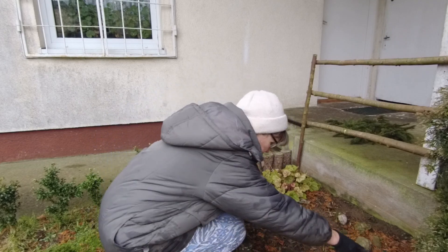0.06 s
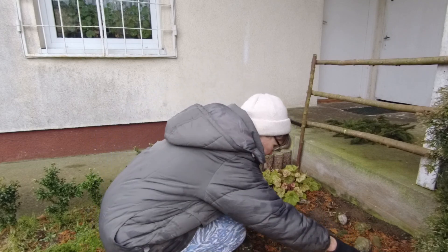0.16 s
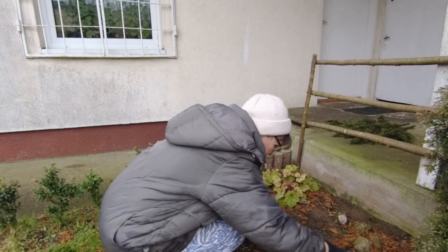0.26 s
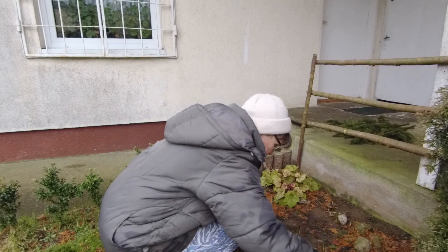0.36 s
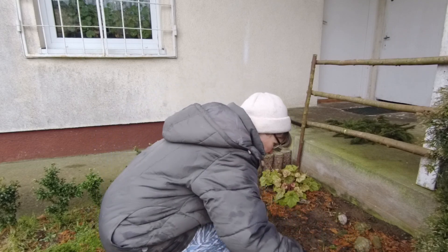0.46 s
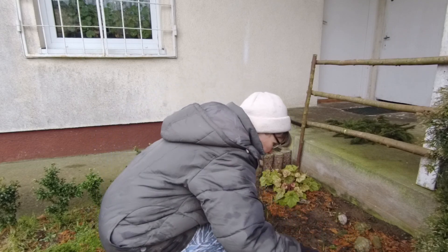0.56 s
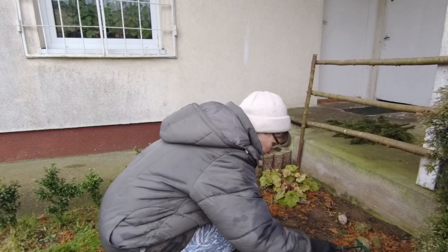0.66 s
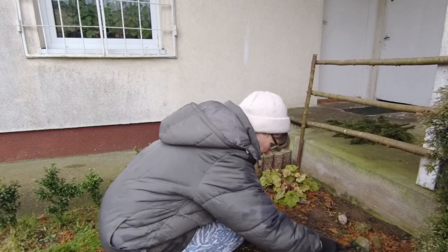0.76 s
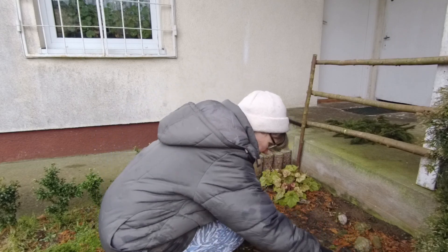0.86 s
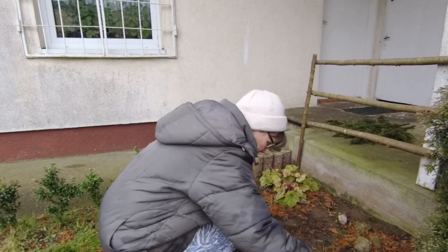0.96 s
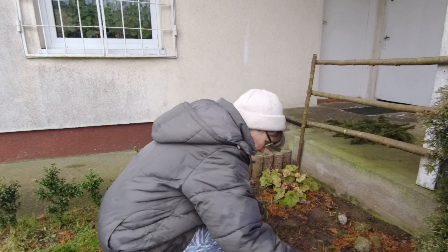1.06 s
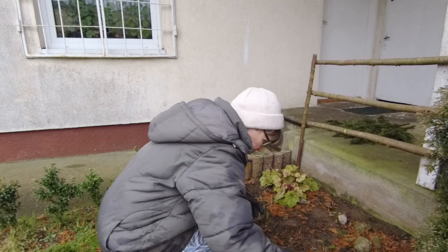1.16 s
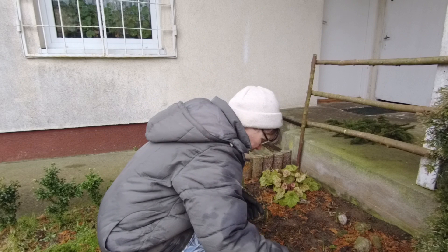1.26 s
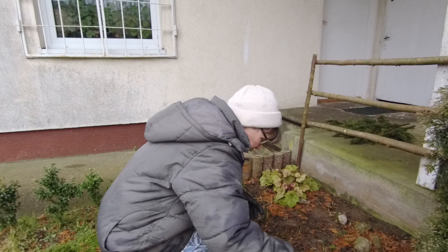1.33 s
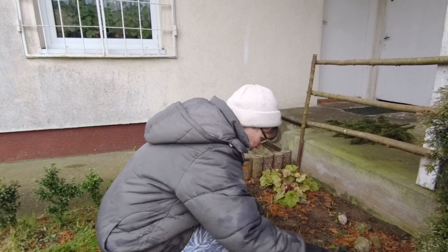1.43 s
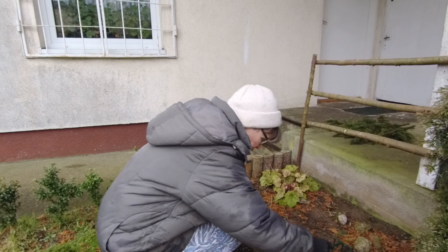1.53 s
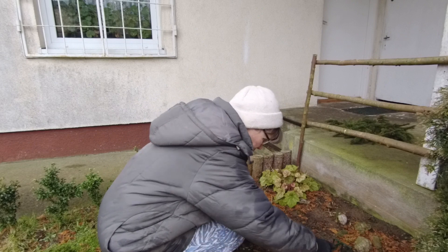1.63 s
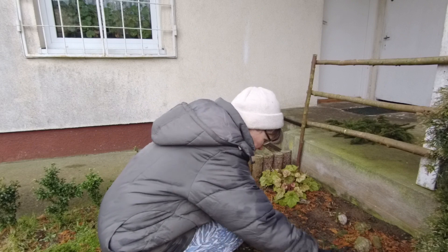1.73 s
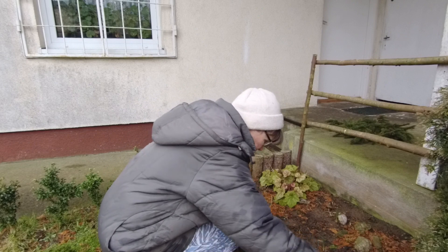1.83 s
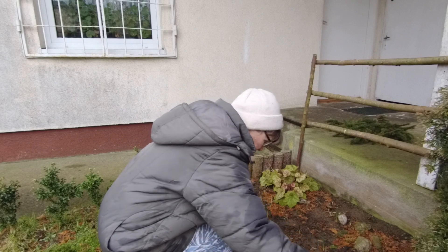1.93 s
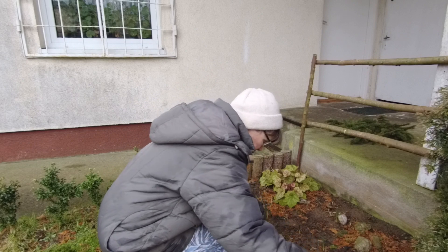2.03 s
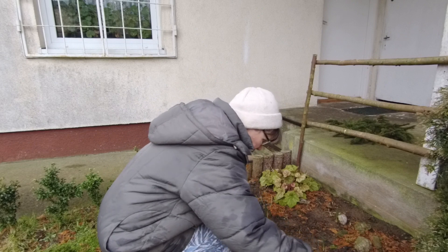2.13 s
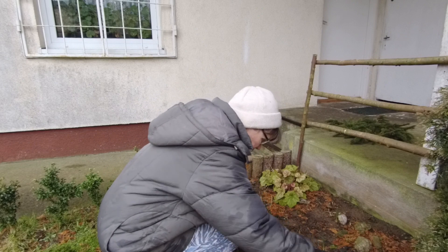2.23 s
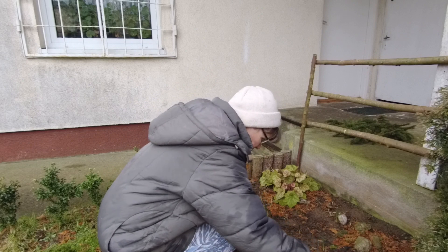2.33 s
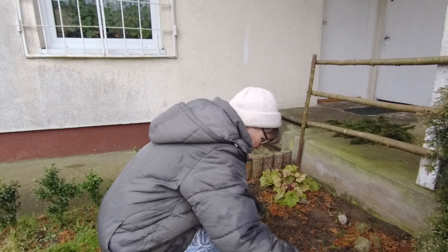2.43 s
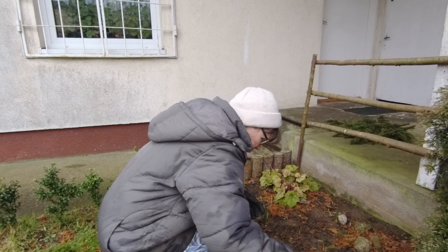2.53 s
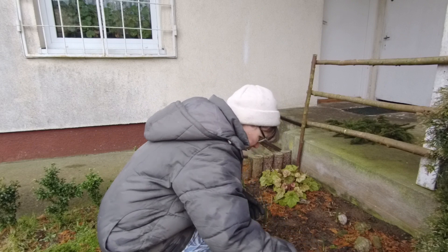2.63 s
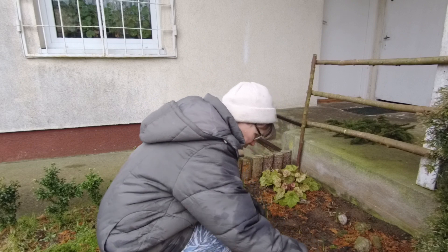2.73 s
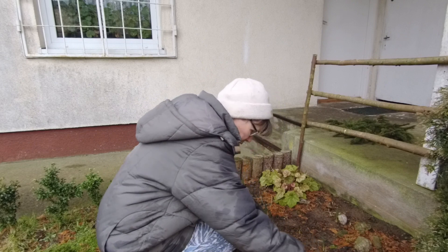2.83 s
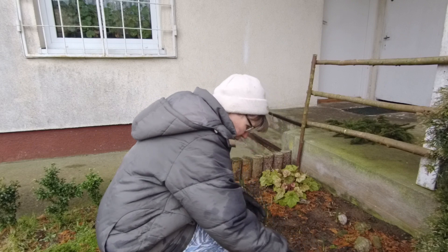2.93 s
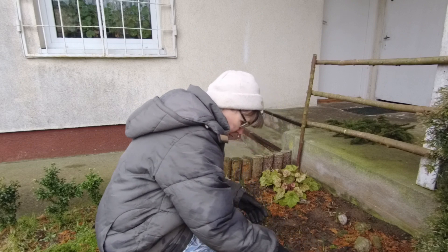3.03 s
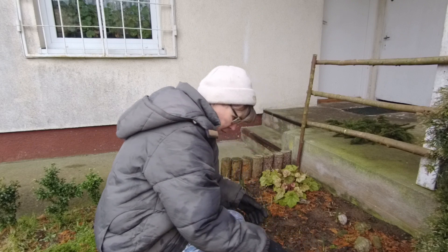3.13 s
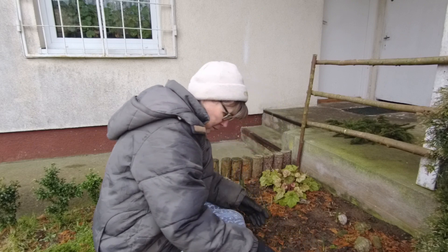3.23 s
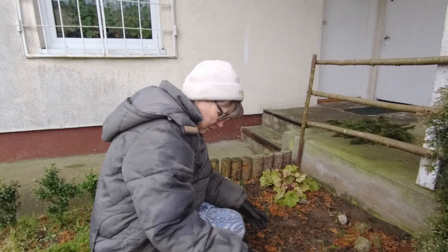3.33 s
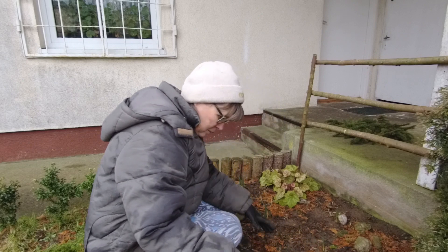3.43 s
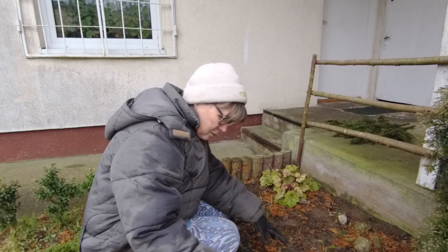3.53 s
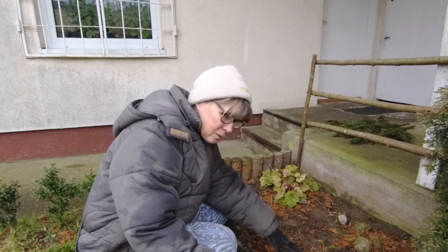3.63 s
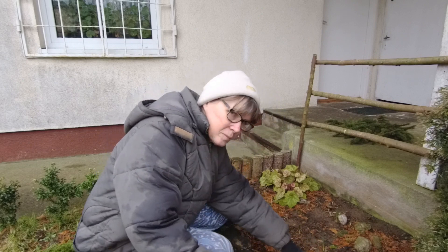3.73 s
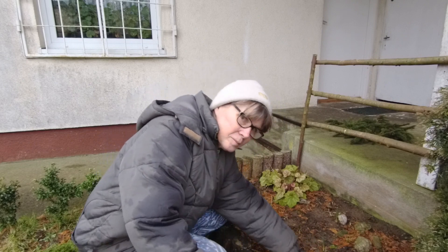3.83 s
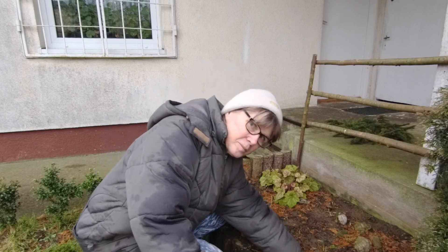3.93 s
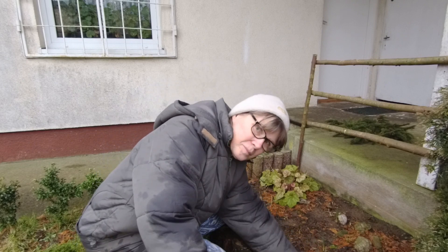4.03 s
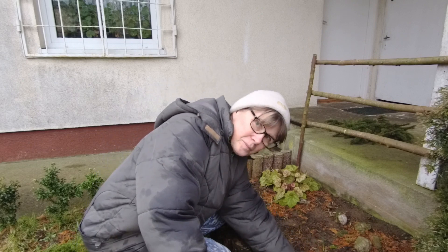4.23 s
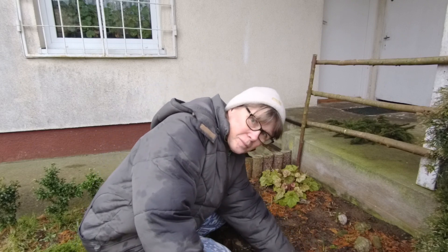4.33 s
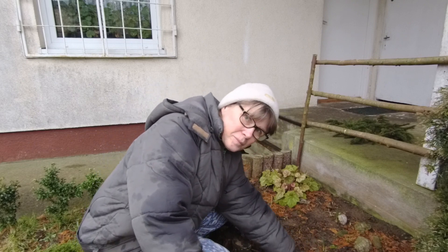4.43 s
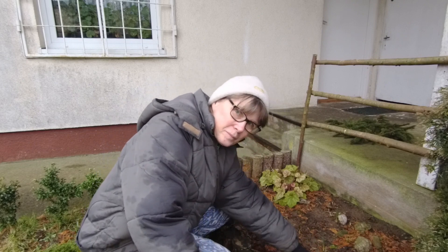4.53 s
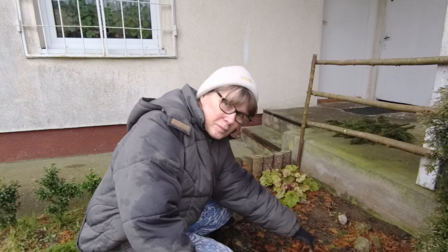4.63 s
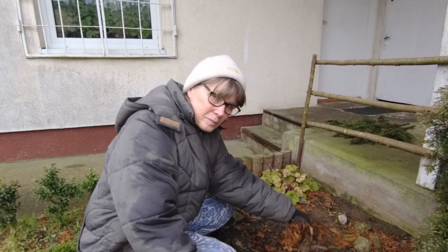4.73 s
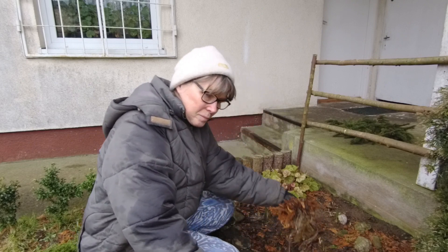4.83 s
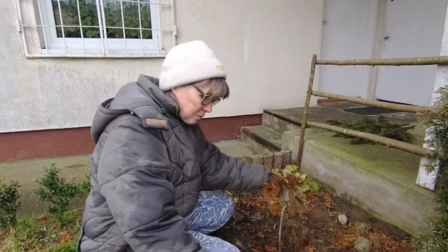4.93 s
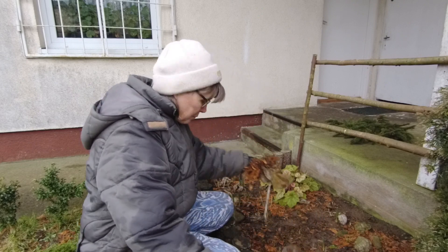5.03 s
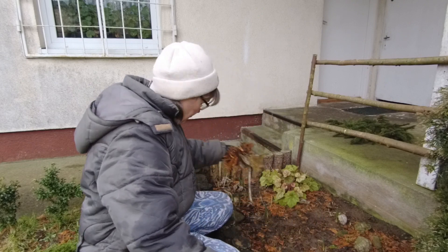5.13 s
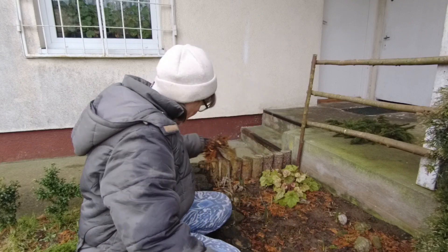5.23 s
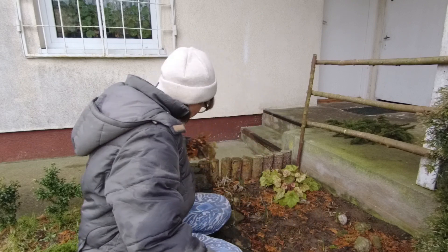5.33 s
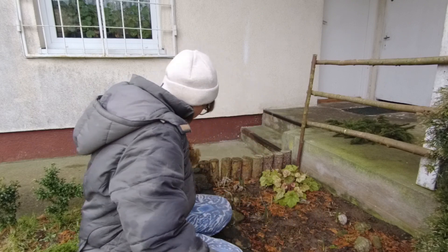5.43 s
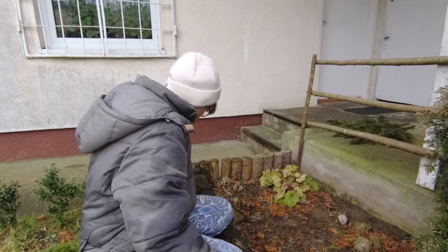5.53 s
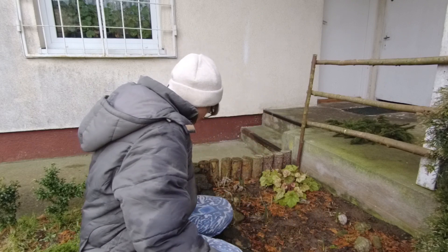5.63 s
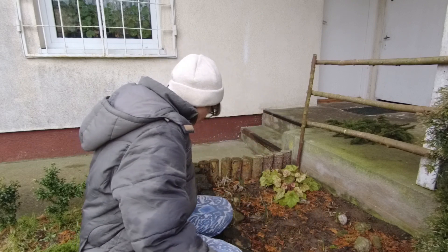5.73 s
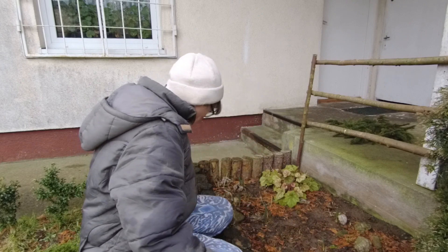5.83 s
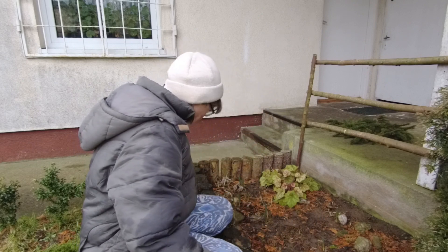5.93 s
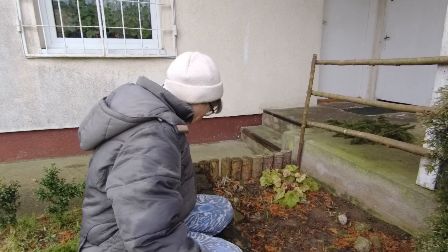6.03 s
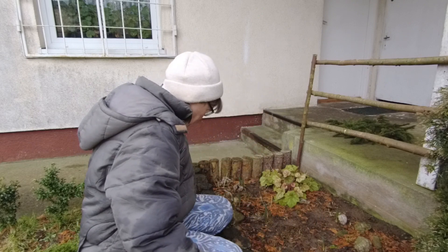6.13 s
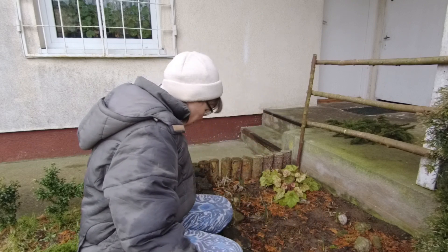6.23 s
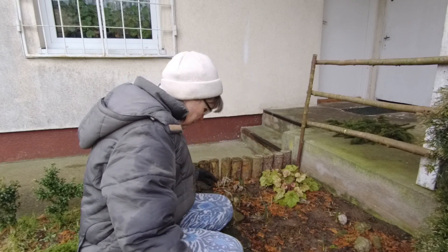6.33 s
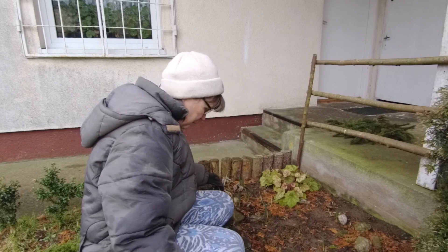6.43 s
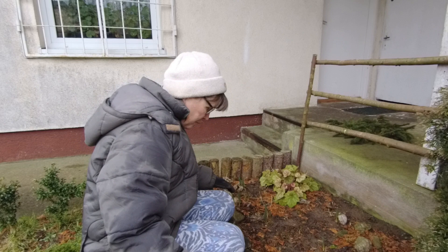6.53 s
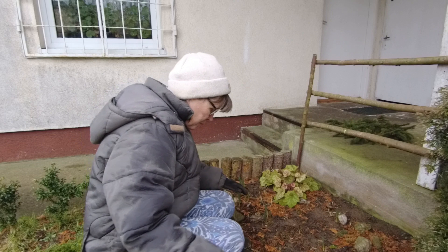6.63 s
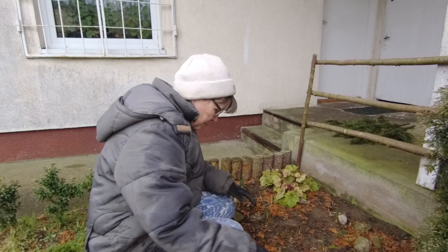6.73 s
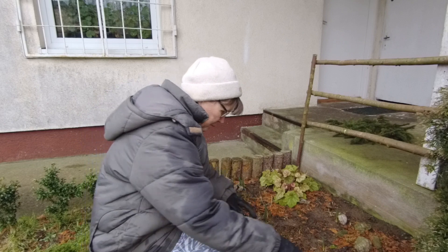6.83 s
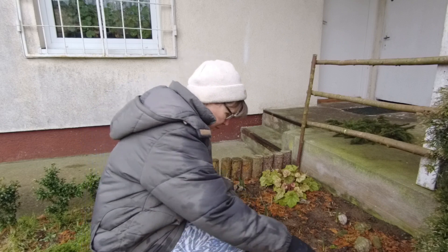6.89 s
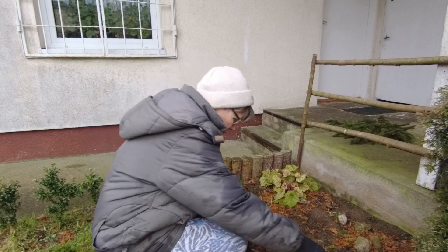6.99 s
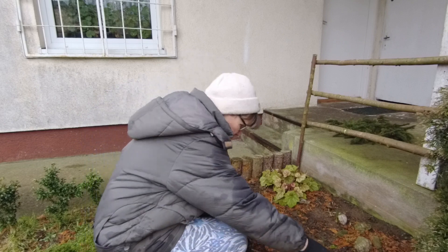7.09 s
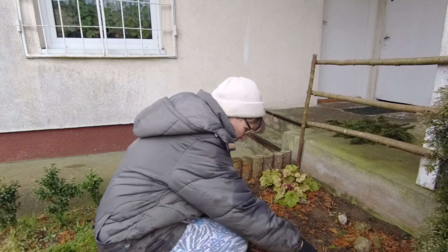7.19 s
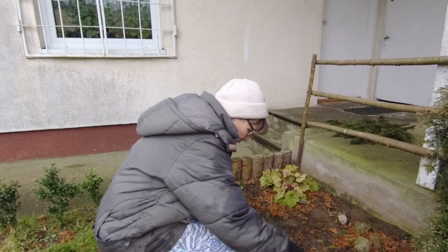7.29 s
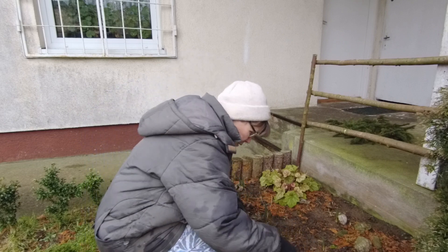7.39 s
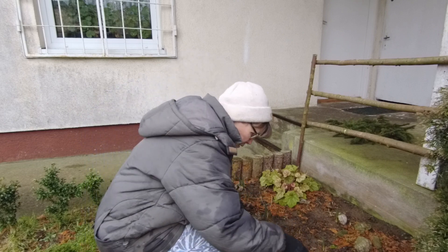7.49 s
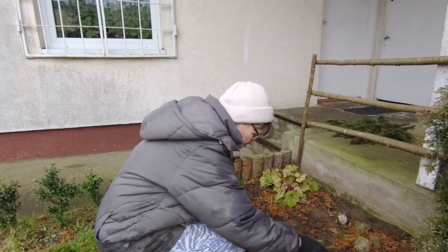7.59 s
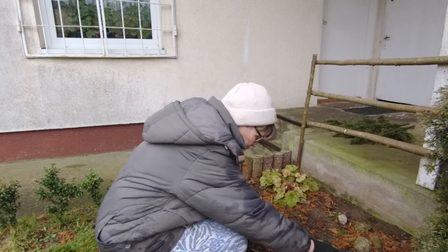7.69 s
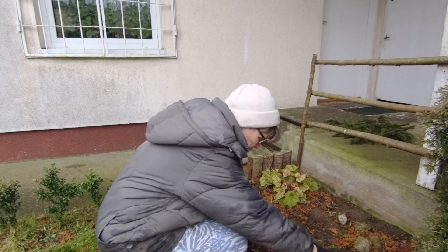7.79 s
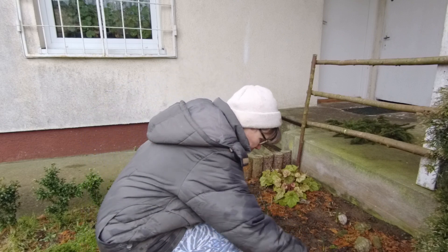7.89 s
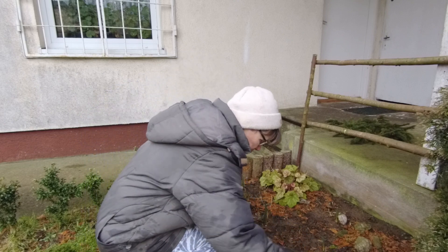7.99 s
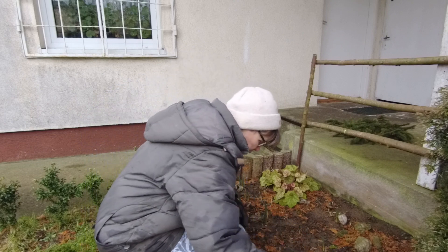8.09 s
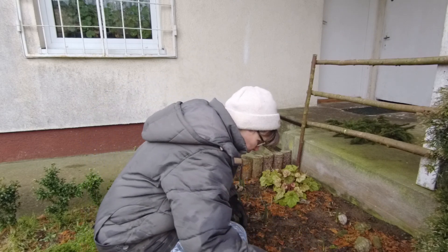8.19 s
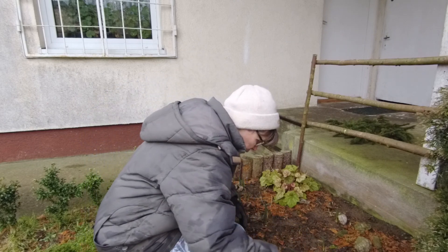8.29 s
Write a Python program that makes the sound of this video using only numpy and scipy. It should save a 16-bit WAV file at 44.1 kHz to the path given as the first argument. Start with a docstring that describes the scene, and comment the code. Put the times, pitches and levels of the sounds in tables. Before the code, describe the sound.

Close stereo sound of gardening: dry leaves fizz and crackle in uneven bursts, brittle stems snap, and thin metal tines chatter and clink against small stones. Midway the metal stops, leaving light hand rustling, faint shifting on soft earth and occasional bird whistles. Leaves drop in a quick dull thud, then the rake scratches again. Steady low traffic hush and a barely audible high whine lie behind, with short scattered reflections off walls.

```python
"""Flower bed beside a house wall: a crouching gardener claws dry leaves with a small steel hand rake, close by.
The tines crack and ring on stones and chatter through grit; leaves crackle in dense grains and stalks snap.
Weight shifts on soft soil, and a wad of leaves is dumped with a hollow thump: a quick run of soft blows.
Small birds whistle clearly in arches between the houses, other calls are blurred to soft bands of pitch;
distant traffic is coloured noise, with a faint high electronic whine. Walls and steps scatter echoes."""
import sys
import numpy as np
from scipy import signal
from scipy.fft import rfft, irfft, next_fast_len
from scipy.io import wavfile
from scipy.ndimage import uniform_filter1d

SR = 44100
rng = np.random.default_rng(int(sys.argv[2]) if len(sys.argv) > 2 else 0)


def inscribe(sig):
    """Save sig as 16-bit PCM at rate SR to the path in sys.argv[1].

    A 1-D sig is mono; a 2-D sig holds one channel per row.
    Samples are clipped to [-1, 1] before scaling.
    """
    pcm = np.round(np.clip(np.atleast_2d(sig).T, -1, 1) * 32767)
    wavfile.write(sys.argv[1], SR, pcm.astype(np.int16))


N = 368235
TIME = np.arange(N) / SR

# spectrum of the distant traffic: f/Hz, level/dB
TRAFFIC_SPECTRUM = [(20, -20), (70, -32), (110, -26), (170, -16), (300, -4), (800, 1.5), (1100, 1),
                    (1900, -13), (4100, -15), (5000, -17), (6600, -17), (8000, -22.5), (15700, -23)]
# pushes through leaves, by rake or hand: t/s, length/s, fall by 20 dB/s, fizz level/dB, crunch level/dB
LEAF_PUSHES = [(0.0, 0.053, 0.7, -59, -62), (0.09, .02, 0.1, -47.5, -59), (0.19, .05, .1, -54, -62),
               (0.252, .018, .08, -39, -44), (0.27, .15, 0.09, -37.5, -50),
               (1.102, .11, 0.11, -41.5, -44.5), (1.97, .04, 0.06, -41, -44.5),
               (2.467, .033, .14, -36, -46), (2.788, .025, 0.2, -45.5, -45),
               (2.82, .21, 0.1634, -33.5, -37), (3.10, 0.14, .5, -54, -52.5),
               (3.478, 0.26, 0.46, -53.5, -52.5), (3.543, .022, 0, -42.5, -53),
               (3.96, 0.22, 0.5, -54.5, -55.5), (4.185, .2, 0.28, -43, -44), (4.523, .08, .2, -53, -55.5),
               (4.725, .13, .27, -51, -48), (5.07, .04, .06, -54, -53), (5.113, .018, .06, -45, -43),
               (6.01, .045, .04, -52, -52), (6.054, .036, .07, -30.5, -36), (6.22, 0.35, .25, -53, -54),
               (6.322, .02, .04, -45, -45), (6.371, 0.019, 0.08, -42.5, -57),
               (6.425, .025, 0.13, -47.5, -53), (6.633, .14, 0.37, -43.5, -43.5), (6.92, .1, .2, -53, -55),
               (7.212, 0.043, .075, -44, -54), (7.323, 0.046, 0.17, -39.5, -46.5),
               (7.518, .014, .04, -48, -59), (7.795, .022, .06, -53, -59), (7.885, .065, 0.3, -53, -58)]
# spectrum of dry litter: f/Hz, level/dB
LITTER_SPECTRUM = [(200, -37), (350, -19.5), (700, -12.5), (1150, -13), (1700, -5), (2700, -1), (4000, -1),
                   (5300, -1.5), (7500, -5.5), (9900, -7.5), (14900, -17), (16000, -13.5)]
# twigs and stiff leaves snapping: t/s, level/dB
SNAPS = [(0.1073, -36), (0.257, -27), (0.26, -20), (0.686, -38.5), (2.4797, -35), (2.808, -26),
         (2.883, -15), (2.945, -23), (3.3627, -28), (3.559, -26), (4.332, -23.5), (4.4555, -27),
         (5.0163, -30), (5.0985, -35), (5.119, -23.5), (5.24, -38), (6.062, -18.5), (6.329, -28),
         (6.341, -26), (6.379, -27), (6.387, -32), (6.597, -35), (7.231, -36), (7.7988, -33.5)]
# pulls of the rake through grit: t/s, length/s, level/dB
STROKES = [(0.25, .02, -41), (0.29, 0.099, -50), (0.981, 0.022, -39.5), (1.011, 0.021, -32.5),
           (1.053, 0.14, -46.5), (1.749, .18, -40), (1.935, .075, -34.5), (2.33, 0.033, -42),
           (2.395, 0.1, -41.5), (7.317, .05, -39.5), (7.955, 0.054, -31), (8.048, 0.058, -35)]
# spectrum of tines on grit: f/Hz, level/dB
SCRAPE_SPECTRUM = [(300, -34), (600, -22), (1200, -21), (1450, -4.5), (1800, -10), (2100, -1.5),
                   (2500, -2.5), (3000, -1), (3600, 1), (4400, -6), (7000, -5), (11000, -21.5),
                   (13800, -12.5), (14600, -27), (16000, -34)]
# ringing modes of the rake: f/Hz, level/dB, t60/s
TINE_MODES = [(1455, -4.5, 0.079), (1732, -6.5, 0.13), (2062, 0.5, 0.14), (2580, -10, 0.058),
              (2967, 5, 0.16), (3500, -5, 0.078), (3870, -8, 0.073), (5780, -12, .06), (5830, -14, .05),
              (6140, -7, 0.054), (6760, 3, 0.088), (7020, -11, 0.054), (7400, -7, .05), (7710, 0, 0.056),
              (9530, -3, 0.07), (11540, -8.5, .06), (14500, -5, 0.065), (14670, -6, 0.056)]
# clear chirps, each note an arch: t/s, length/s, first f/Hz, middle f/Hz, last f/Hz, level/dB
CHIRPS = [(0.283, 0.039, 3890, 4230, 4400, -38), (0.322, .06, 3450, 4100, 3520, -28),
          (0.324, .014, 3100, 3500, 3750, -28), (0.382, .034, 3450, 3140, 2950, -32.5),
          (3.527, 0.039, 4750, 4600, 4270, -47), (3.634, .038, 4870, 5050, 5130, -38),
          (3.66, 0.1, 2700, 4480, 3100, -27), (3.679, .021, 3790, 3970, 4000, -20),
          (3.718, .042, 3500, 3540, 3000, -35.5), (4.228, .045, 7560, 7480, 6900, -44.5),
          (4.702, 0.033, 7600, 7640, 7350, -42)]
# tines striking grit: t/s, level/dB, brightness/(dB per octave), most excited ring f/Hz, soil thud level/dB
CLINKS = [(0.8462, -22, -6, 2220, -34.5), (0.8532, -8, 9, 5850, -36.5), (0.866, -21, 10, 7700, -55),
          (0.874, -18, 4, 6260, -63), (0.9717, -25, -7, 2800, -40.5), (1.0074, -9, 2, 3480, -53),
          (1.020, -15.5, -1.5, 3550, -56), (1.1002, -20.5, -1, 3430, -47.5), (1.1859, -24.5, -4, 2800, -56),
          (1.7568, -31, -9, 2140, -73), (1.8945, -19, -0.5, 3000, -52), (1.910, -24, 5, 7400, -62),
          (1.9487, -19.5, -10, 2980, -50), (1.9968, -17, -9, 3340, -60), (2.3275, -29.5, -6, 2050, -60),
          (2.3343, -22, -4, 2020, -75), (2.402, -28.5, -1, 3030, -49), (2.422, -33, -2, 2980, -38.5),
          (7.325, -26, -5, 1940, -53), (7.3379, -16, 1, 3650, -57), (7.373, -30, 25, 6750, -41.5),
          (7.515, -32.5, 0.5, 3000, -60), (7.524, -33, 5, 6150, -55), (7.955, -18.5, 0, 2920, -42),
          (7.9699, -7, 2, 2950, -56), (7.981, -12.5, -4, 3020, -53), (8.0118, -14, -1.5, 2520, -50),
          (8.0524, -22, -1, 2080, -57), (8.066, -21.5, 27, 3480, -59), (8.0881, -19.5, 0.5, 3250, -39)]
# crack of steel on stone: f/Hz, level/dB
CRACK_SPECTRUM = [(300, -40), (1200, -20.5), (1800, -8), (3200, 3), (4500, -10), (6500, -2.5), (8000, -7.5),
                  (11000, -17), (13500, -20), (14600, -10), (16000, -27)]
# blurred bird calls: t of the middle/s, length/s, f/Hz, level/dB
BLURRED_CALLS = [(1.39, .2, 4600, -56.5), (3.2, 0.23, 3100, -45.5), (3.17, 0.18, 4400, -46),
                 (4.79, 0.11, 4300, -43.5), (4.825, .11, 3400, -38.5), (6.49, 0.13, 3130, -42),
                 (6.47, .13, 4500, -43), (6.635, .11, 3500, -41), (6.605, 0.036, 4950, -39),
                 (8.3, .1, 4500, -57)]
# shifts of weight on the soil: t/s, length/s, level/dB
WEIGHT_SHIFTS = [(3.623, 0.13, -59), (4.197, .14, -58.5), (4.576, 0.053, -56), (4.882, 0.29, -63.5)]
# spectrum of soft earth: f/Hz, level/dB
SOIL_SPECTRUM = [(30, -24), (80, -19), (200, -10.5), (380, 9.5), (550, -9), (1200, -24), (3000, -65)]
# the wad landing, its edge and then its bulk: t/s, length/s, build-up/s, level/dB, highest f/Hz
LANDINGS = [(6.003, .04, .008, -30.5, 1150), (6.058, .043, .034, -21.5, 2600)]
# spectrum of the hollow blows: f/Hz, level/dB
HOLLOW_SPECTRUM = [(70, -58), (120, -34), (200, -20), (290, -4), (470, -5.5), (600, -16), (700, -10),
                   (1000, -21), (1300, -13), (2400, -20.5), (3500, -45), (5500, -90)]
# low resonances colouring the thump: f/Hz, t60/s
THUMP_RESONANCES = [(308, .14), (343, .13), (419, .1), (469, .09)]
# single echoes of the birds from walls: delay t/s, level/dB
WALL_ECHOES = [(.026, -16), (.052, -8), (.088, -16)]
# decay of the scattered echoes, before any lingering: f/Hz, t60/s
YARD_DECAY = [(200, 0.71), (1000, 0.33), (4000, 0.57), (8000, 0.54), (15000, 0.67)]

TRAFFIC_DB = -52  # level about which the hush swells
BITE_S, LIFT_S = 0.012, 0.07  # tines bite this fast, and fall 20 dB in this time as they lift
PRESS_SHARE = 0.36  # part of a push over which the pressure builds
RAKE_SIDE_DB, LITTER_SIDE_DB, AIR_SIDE_DB = -16, -7.5, -4.5  # width of each source
WIDE_HZ, EDGE_HZ = 3000, 15850  # left and right differ above the first; the recorder stops at the second


def amp(db):
    """Decibels to gain."""
    return np.exp(np.asarray(db) * (np.log(10) / 20))


def unit(x):
    """Scales to rms 1."""
    return x / np.sqrt(np.mean(x ** 2) + 1e-20)


def read(points, hz):
    """Reads a table of values over frequency on a log-frequency axis."""
    f, value = np.transpose(points)
    return np.interp(np.log(hz + 1), np.log(f + 1), value)


def add(mix, s, sound):
    """Mixes a sound in at time s."""
    part = mix[max(round(s * SR), 0):][:len(sound)]
    part += sound[:len(part)]


def colour(x, points):
    """Causal (minimum-phase) filter with the given spectrum, so that clicks keep their sharp front."""
    hz = abs(np.fft.fftfreq(2048, 1 / SR))
    log_gain = np.log(amp(read(points, hz)))
    taps = np.fft.ifft(np.exp(np.conj(signal.hilbert(log_gain)))).real
    return signal.oaconvolve(x, taps)[:len(x)]


def band(x, lo_hz, hi_hz):
    """Band-pass; a trace of signal keeps the filter from underflowing in silence."""
    trace = 1e-15 * (np.arange(len(x)) % 16)
    edges = [lo_hz, min(hi_hz, SR / 2 - 1)]
    return signal.sosfilt(signal.butter(3, edges, "band", fs=SR, output="sos"), x + trace)


def wander(rate_hz, size):
    """Smooth random motion of rms 1."""
    n = next_fast_len(size, True)
    lowpass = np.exp(-np.minimum(np.fft.rfftfreq(n, 1 / SR) / rate_hz, 10) ** 2)
    return unit(irfft(rfft(rng.standard_normal(n)) * lowpass, n)[:size])


def envelope(length, rise_s, fall_s):
    """One movement: builds, holds to the end of its length, then falls 20 dB every fall_s."""
    fall_s = max(fall_s, 1 / SR)
    t = TIME[:int((abs(length) + 3 * fall_s) * SR)]  # ends 60 dB down
    swell = np.sin(np.pi / 2 * np.minimum(t / max(rise_s, 1 / SR), 1)) ** 2
    return swell * amp(-20 * np.maximum(t - length, 0) / fall_s)


def movements(rows, rise_s, fall_s):
    """Gain over time of movements (t/s, length/s, level/dB) that share one attack and release."""
    gain = np.zeros(N)
    for s, length, db in rows:
        add(gain, s, amp(db) * envelope(length, rise_s, fall_s))
    return gain


def grains(per_s, spread_db, clump_db):
    """Tiny fractures of uneven size whose loudness swells in clumps."""
    size = amp(spread_db * np.minimum(rng.exponential(1, N), 4) + clump_db * wander(45, N))
    struck = rng.random(N) < per_s / SR
    return unit(size * rng.choice([-1, 1], N) * struck)


def patchy(x, depth_db, hold_s, width_hz):
    """Resonances come and go: a smooth random field over time and frequency raises and lowers the level."""
    hz, t, z = signal.stft(x, SR, nperseg=512)
    field = rng.standard_normal(z.shape)
    for axis, span in enumerate([width_hz / hz[1], hold_s / t[1]]):
        size = max(round(span), 1)
        field = uniform_filter1d(uniform_filter1d(field, size, axis), size, axis)
    return unit(signal.istft(z * amp(depth_db * unit(field)), SR, nperseg=512)[1][:len(x)])


def burst(t, decay_s, tail_db, tail_s):
    """A crack of noise with a weaker, slower settling of debris."""
    return rng.standard_normal(len(t)) * (np.exp(-t / decay_s) + amp(tail_db) * np.exp(-t / tail_s))


def ring(uneven_db, detune):
    """One ring of the tines; the place of contact changes the share and pitch of each mode."""
    t = np.arange(SR // 4) / SR
    hz, db, t60 = np.transpose(TINE_MODES)[:, :, None]
    share, shift, phase = rng.standard_normal((3, len(TINE_MODES), 1))
    decay = amp(db + uneven_db * share - 60 * t / t60)
    return np.sum(decay * np.sin(2 * np.pi * (hz * (1 + detune * shift) * t + phase)), axis=0)


def fuzzy(turn, width_hz):
    """Many threads out of step: a narrow noise around the running phase."""
    return unit(wander(width_hz, len(turn)) * np.cos(turn) + wander(width_hz, len(turn)) * np.sin(turn))


def air(swell_db=0.5, whine_hz=14998, whine_db=-76):
    """Distant traffic as slowly swelling coloured noise, and a faint steady electronic whine."""
    noise = unit(colour(rng.standard_normal(N), TRAFFIC_SPECTRUM))
    hush = noise * amp(TRAFFIC_DB + swell_db * wander(2.8, N))
    return hush + amp(whine_db) * unit(np.sin(2 * np.pi * whine_hz * TIME))


def leaves(fizz_db=-1, crunch_db=-1, split_hz=4600):
    """Dense crackle of dry leaves: light touches fizz, pressing deeper crunches."""
    crackle = colour(grains(per_s=6500, spread_db=2.5, clump_db=1.4), LITTER_SPECTRUM)
    crackle = patchy(crackle, depth_db=3.0, hold_s=0.04, width_hz=150)  # ever new leaves ring
    # each half is levelled by the core of its band
    fizz = band(crackle, split_hz, 20000) / np.std(band(crackle, 5500, 14000))
    crunch = band(crackle, 200, split_hz) / np.std(band(crackle, 1400, 2700))
    light, deep = np.zeros((2, N))
    for s, length, fall_s, light_db, deep_db in LEAF_PUSHES:
        push = envelope(length, PRESS_SHARE * length, fall_s)
        # overlapping pushes add as power
        add(light, s, (amp(light_db) * push) ** 2)
        add(deep, s, (amp(deep_db) * push) ** 2)
    return amp(fizz_db) * np.sqrt(light) * fizz + amp(crunch_db) * np.sqrt(deep) * crunch


def snaps():
    """Single stalks break, each with a pitch of its own."""
    out, t = np.zeros(N), np.arange(SR // 10) / SR
    for s, db in SNAPS:
        snap = colour(burst(t, decay_s=0.0007, tail_db=-12.0, tail_s=0.01), LITTER_SPECTRUM)
        hz = rng.uniform(2110, 5300)
        snap = snap + 0.85 * band(snap, hz / 1.12, hz * 0.92)
        add(out, s, amp(db) * snap / abs(snap).max())
    return out


def scraping(scrape_db=-1, ring_db=-7):
    """Tines chatter through grit, which keeps them ringing; the shifting load favours one ring, then another."""
    chatter = grains(per_s=1800, spread_db=2.0, clump_db=1.5)
    force = movements(STROKES, BITE_S, LIFT_S)
    steel = ring(uneven_db=0, detune=0)
    sing = unit(signal.oaconvolve(chatter, steel)[:N])
    scratch = amp(scrape_db) * unit(colour(chatter, SCRAPE_SPECTRUM)) + amp(ring_db) * sing
    return force * np.std(scratch) * patchy(scratch, depth_db=6.0, hold_s=0.029, width_hz=103)


def chirps(jitter=0.0138, flutter_db=3.5, fuzz_db=-11, lower=0.93, octave_db=-30, taper=0.4):
    """Birds whistle clearly: fluttering tones bend through an arch, a husky edge just below, a faint octave."""
    out = np.zeros(N)
    for s, length, first_hz, middle_hz, last_hz, db in CHIRPS:
        u = np.linspace(0, 1, int(length * SR))
        hz = np.polyval(np.polyfit([0, 0.5, 1], [first_hz, middle_hz, last_hz], 2), u)
        turn = 2 * np.pi * np.cumsum(hz * (1 + jitter * wander(410, len(u)))) / SR
        tone = unit(np.sin(turn) * amp(flutter_db * wander(250, len(u))))
        husk = amp(fuzz_db) * fuzzy(lower * turn, width_hz=410)
        octave = amp(octave_db) * fuzzy(2 * turn, width_hz=660)
        add(out, s, amp(db) * (tone + (husk + octave)) * signal.windows.tukey(len(u), taper))
    return out


def clinks(ring_db=-18, stress_db=8, thud_hz=370, thud_s=0.0079):
    """A tine catches a stone: crack, ring, and a dull push into the soil."""
    out, t = np.zeros(N), np.arange(SR // 4) / SR
    onset = SR // 500  # the first 2 ms set the level of a hit
    hz = np.geomspace(1200, 16000, 120)
    for s, db, bright, ring_hz, thud_db in CLINKS:
        crack = colour(burst(t, decay_s=0.00072, tail_db=-9, tail_s=0.0071), CRACK_SPECTRUM)
        hit = crack / np.std(crack[:onset]) + amp(ring_db) * ring(uneven_db=3.0, detune=0.002)
        # harder contact is brighter, and the struck tine stands out
        tilt = bright * np.log2(np.minimum(hz, 8000) / 4500)
        struck = stress_db * np.exp(-((hz - ring_hz) / 260) ** 2)
        hit = colour(hit, np.c_[hz, tilt + struck])
        add(out, s, amp(db) * hit / (2 * np.std(hit[:onset])))
        push = burst(t, decay_s=thud_s, tail_db=-32, tail_s=0.03)
        thud = band(band(push, thud_hz / 1.49, thud_hz * 1.39), 220, 1170)
        add(out, s, amp(thud_db) * thud / (2 * np.std(thud[:SR // 50])))
    return out


def blurred_calls():
    """Blurred bird calls: soft, narrow smears of pitch that swell and fade."""
    out = np.zeros(N)
    for s, length, hz, db in BLURRED_CALLS:
        size = int(length * SR)
        turn = 2 * np.pi * np.cumsum(hz * (1 + 0.0201 * wander(24.6, size))) / SR
        swell = np.sin(np.linspace(0, np.pi, size))
        add(out, s - length / 2, amp(db) * fuzzy(turn, width_hz=370) * swell)
    return np.std(out) * patchy(out, depth_db=4.5, hold_s=0.035, width_hz=170)


def birds():
    """Clear and blurred birds, and their single echoes from the walls."""
    calls = chirps() + blurred_calls()
    out = calls.copy()
    for delay_s, db in WALL_ECHOES:
        add(out, delay_s, amp(db) * calls)
    return out


def shuffle(rise_s=0.054, fall_s=0.27):
    """Soft earth gives under the shoes in clumped, dull grains."""
    weight = movements(WEIGHT_SHIFTS, rise_s, fall_s)
    return unit(colour(grains(per_s=900, spread_db=1.0, clump_db=4.0), SOIL_SPECTRUM)) * weight


def dump(resonance_db=-5, fall_s=0.04, lowest_hz=190):
    """The wad lands as a quick run of soft blows; low resonances colour the thump."""
    blows, t = grains(per_s=1500, spread_db=1.5, clump_db=0.5), TIME[:SR // 3]
    resonances = sum(amp(-60 * t / t60) * np.sin(2 * np.pi * hz * t) for hz, t60 in THUMP_RESONANCES)
    out = np.zeros(N)
    for s, length, rise_s, db, top_hz in LANDINGS:
        landing = blows * movements([(s, length, db)], rise_s, fall_s)
        landing = landing[round(s * SR):][:len(t)]
        resonant = signal.fftconvolve(landing, resonances)[:len(t)]
        thump = unit(unit(colour(landing, HOLLOW_SPECTRUM)) + amp(resonance_db) * unit(resonant))
        add(out, s, band(np.std(landing) * thump, lowest_hz, top_hz))
    return out


def yard(x, wet_db, first_s, linger=1):
    """Scattered echoes from walls and steps, each band dying at its own speed; linger stretches the decay."""
    taps = rng.standard_normal(SR) * (rng.random(SR) < 2500 / SR) * (TIME[:SR] > first_s)
    hz, t, z = signal.stft(taps, SR, nperseg=256)
    decay = amp(-60 * t / (linger * read(YARD_DECAY, hz)[:, None]))
    tail = signal.istft(z * decay, SR, nperseg=256)[1]
    return x + amp(wet_db) * signal.oaconvolve(x, tail / np.linalg.norm(tail))[:N]


def scatter(x):
    """What differs between left and right: only the treble, with a scattered phase."""
    hz, t, z = signal.stft(x, SR, nperseg=128)
    side = signal.istft(z * np.exp(2j * np.pi * rng.random(z.shape)), SR, nperseg=128)[1][:N]
    highpass = signal.firwin(255, WIDE_HZ, pass_zero=False, fs=SR)
    return np.sqrt(2) * signal.oaconvolve(side, highpass, "same")


def scene():
    """Birds and soil sit in the centre, the rake nearly so; scattered leaves and the traffic sound wide."""
    rake = band(yard(clinks() + scraping(), wet_db=-16, first_s=0.01), 160, 20000)
    litter = band(yard(leaves() + snaps() + dump(), wet_db=-17, first_s=0.0076), 125, 21000)
    song = yard(birds(), wet_db=-10.5, first_s=0.008, linger=1.3)
    hush = air()
    mid = rake + litter + hush + song + shuffle()
    side = scatter(amp(RAKE_SIDE_DB) * rake + amp(LITTER_SIDE_DB) * litter + amp(AIR_SIDE_DB) * hush)
    return np.array([mid + side, mid - side])


def record(dry):
    """The band limit of the recorder behind the microphone: a steep low-pass."""
    lowpass = signal.firwin(511, EDGE_HZ, window=("kaiser", 9), fs=SR)
    return signal.oaconvolve(dry, lowpass[None], "same")


dry = scene()
out = record(dry)
inscribe(out)
```